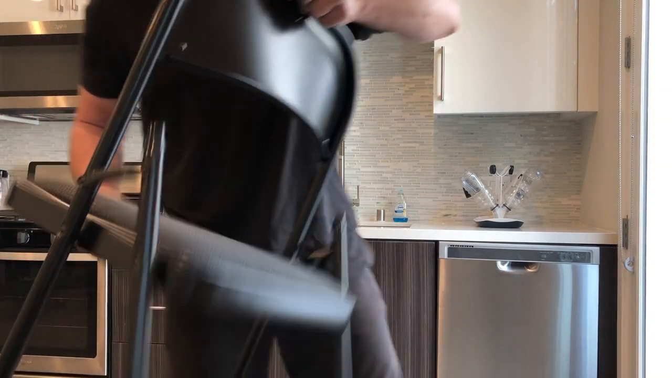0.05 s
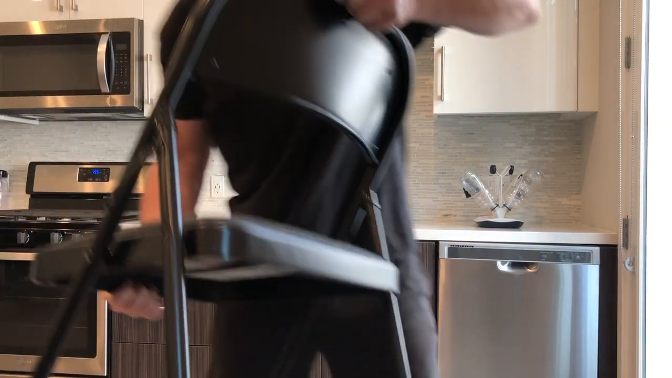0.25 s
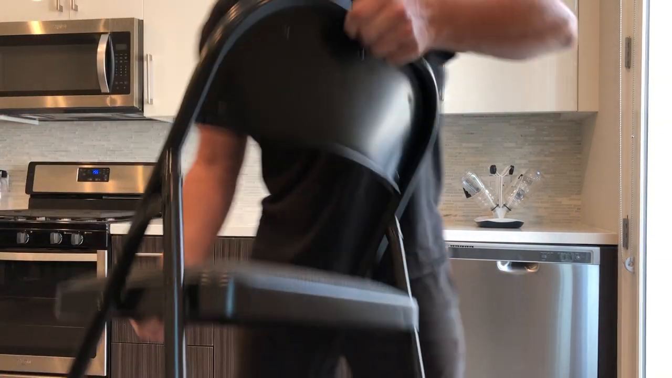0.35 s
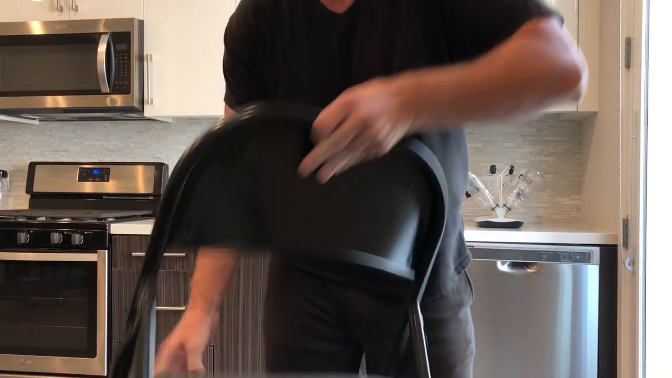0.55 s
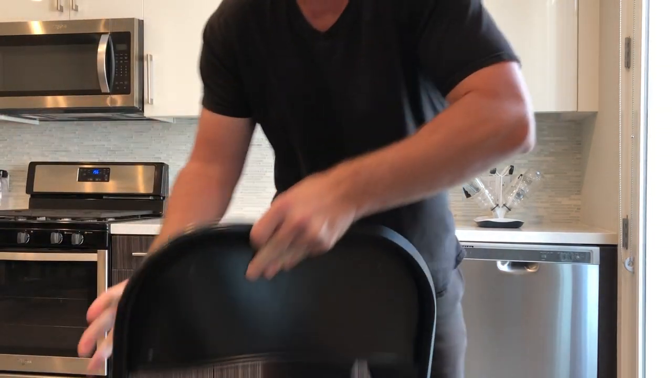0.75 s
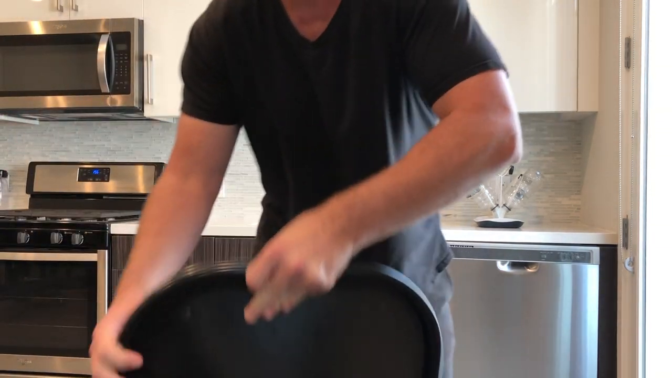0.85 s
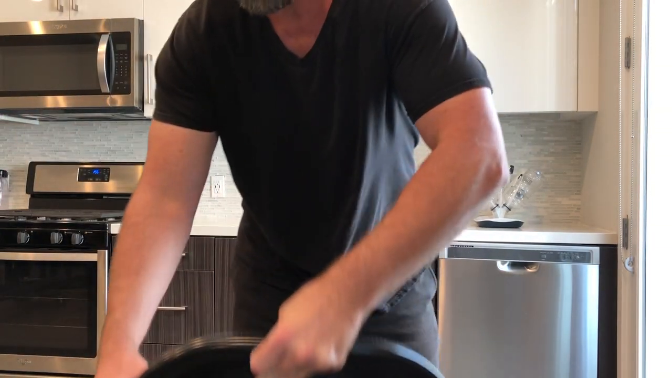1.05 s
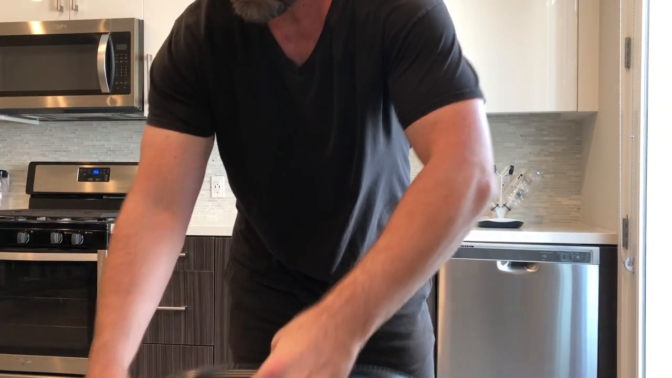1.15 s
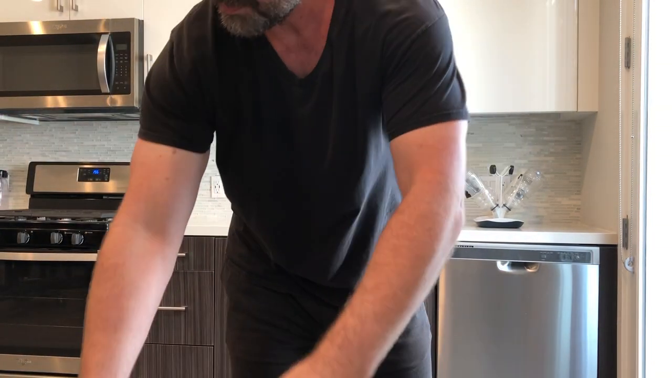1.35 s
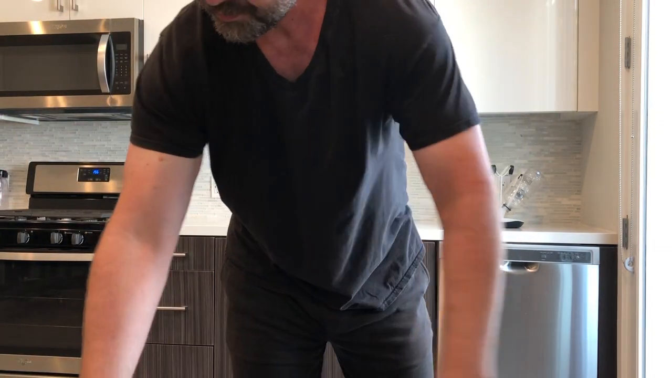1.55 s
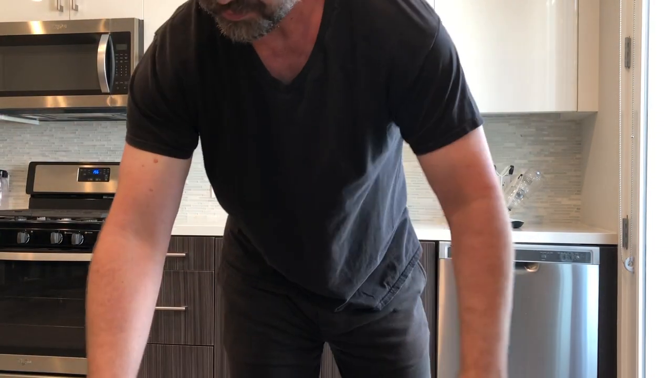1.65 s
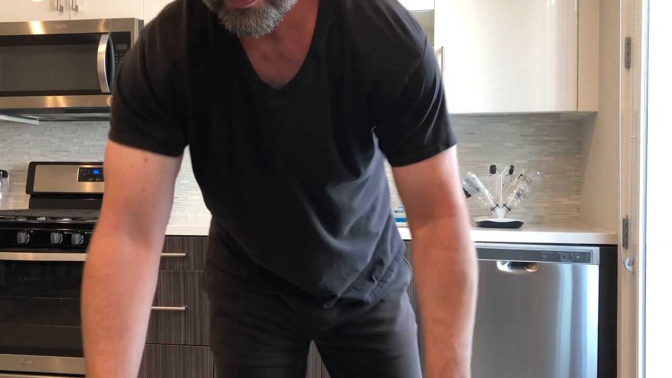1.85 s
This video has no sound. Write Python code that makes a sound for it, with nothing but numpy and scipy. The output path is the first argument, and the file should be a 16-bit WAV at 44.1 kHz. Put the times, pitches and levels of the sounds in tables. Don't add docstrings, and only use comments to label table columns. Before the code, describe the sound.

After two tiny hinge clicks, a folding chair's metal seat slams its stop and rings through a hard, reverberant kitchen; a soft brush follows, then its feet knock and scuffle down. Single microphone, faint room hum.

```python
import sys
import numpy as np
from scipy import signal
from scipy.fft import rfft, irfft
from scipy.io import wavfile
from scipy.ndimage import uniform_filter1d

SR = 44100
rng = np.random.default_rng(int(sys.argv[2]) if len(sys.argv) > 2 else 0)


def rack_gain(trim_db):
    fader = np.asarray(trim_db, float)
    return 10 ** (fader / 20)


def to_wav(sig):
    pcm = np.clip(np.atleast_2d(sig), -1, 1) * 32767
    pcm = np.round(pcm).astype(np.int16)
    wavfile.write(sys.argv[1], SR, pcm.T)


N = 83790

# (time [s], crack level [dB], ring level [dB], thud level [dB], crack length [s])
SEAT_HITS = [
    (.247, -13, -26, -56, 0.013),
    (.2495, -23, -59.5, -32, 0.0044),
    (.264, -34.5, -37.5, -25, 0.0043),
    (.278, -26.5, -42.5, -36, 0.017),
    (.293, -24, -27.5, -33, 0.0031),
]


def evened(x):
    return x / np.sqrt(np.mean(x ** 2) + 1e-20)


def read(points, hz):
    f, value = np.transpose(points)
    return np.interp(np.log(hz + 1), np.log(f + 1), value)


def colour(points, size=2048):
    log_gain = np.log(rack_gain(read(points, abs(np.fft.fftfreq(size, 1 / SR)))))
    response = np.exp(np.conj(signal.hilbert(log_gain)))
    taps = np.fft.ifft(response).real[:size // 2]
    return taps / np.linalg.norm(taps)


def hiss(points):
    gain = rack_gain(read(points, np.fft.rfftfreq(N, 1 / SR)))
    return evened(irfft(rfft(rng.standard_normal(N)) * gain, N))


def modes(table, longest_s, rise_s, count):
    t = np.arange(SR // 2) / SR
    spread = 0.06 * min(count / 3, 1)
    out = np.zeros(len(t))
    for hz, db, t60 in table:
        decay = rack_gain(db - 60 * t / np.clip(t60, 0.02, longest_s))
        pitch_hz = hz * (1 + spread * rng.uniform(-1, 1, (count, 1)))
        phase = (count > 1) * rng.random((count, 1))
        out += (decay * np.sin(2 * np.pi * (pitch_hz * t + phase))).sum(0)
    power = count * sum(rack_gain(2 * row[1]) for row in table) / 2
    return out * (1 - np.exp(-t / rise_s)) * np.cos(np.pi * t) / np.sqrt(power)


def room(x):
    # (frequency [Hz], t60 [s])
    band_t60 = [(60, 0.16), (120, 0.5), (300, 0.75), (1500, 0.93), (4000, 0.94), (7500, 0.75),
                (11000, 0.48), (16000, 0.43)]
    gap_s, build_s = 0.002, 0.0044
    taps = np.zeros(SR + SR // 2)
    at = np.arange(0, len(taps) - 10, 10)
    taps[at + rng.integers(0, 10, len(at))] = rng.choice([-1., 1.], len(at))
    hz, t, z = signal.stft(taps, SR, nperseg=256)
    tail = signal.istft(z * rack_gain(-60 * t / read(band_t60, hz)[:, None]), SR, nperseg=256)[1]
    late = np.maximum(np.arange(len(tail)) / SR - gap_s, 0)
    tail = tail * (1 - np.exp(-late / build_s))
    return signal.fftconvolve(x, tail / np.linalg.norm(tail))[:N]


def hits(rows, tone, ring, low, longest_s, wet_db, ring_wet_db, thud_wet_db):
    t = np.arange(2000) / SR
    crack, blow, strike, thud = np.zeros((4, N + SR))
    for s, crack_db, ring_db, thud_db, length in rows:
        at = round(s * SR)
        noise = rng.standard_normal(len(t))
        attack = np.minimum(t / 0.00013, 1)
        shape = attack * np.exp(-(t / np.clip(length, 0.001, 0.03)) ** 2)
        grain_db = 2.5 * 4.1 * uniform_filter1d(noise[::-1], size=9)
        crack[at:at + len(t)] += rack_gain(crack_db) * evened(noise * rack_gain(grain_db)) * shape
        blow[at] += rack_gain(crack_db) * np.linalg.norm(shape)
        strike[at] += rack_gain(ring_db)
        thud[at:at + SR // 2] += rack_gain(thud_db) * modes(low, 0.4, 0.001, count=1)
    crack, blow = signal.fftconvolve([crack, blow], [colour(tone)], axes=1)[:, :N]
    metal = signal.fftconvolve(strike, modes(ring, longest_s, 0.00036, count=14))[:N]
    thud = thud[:N]
    sent = rack_gain(wet_db) * blow + rack_gain(ring_wet_db) * metal + rack_gain(thud_wet_db) * thud
    return crack + metal + thud + room(sent)


def room_hum():
    # (frequency [Hz], level [dB])
    hum_tone = [(15, -52.5), (25, -17), (123, -12.5), (335, -10), (363, -18.5), (476, -18.5), (641, -23.5),
                (962, -19.5), (16000, -45)]
    return rack_gain(-59.5) * hiss(hum_tone)


def lurches():
    # (time [s], level [dB], width [s])
    shifts = [
        (.03, -50.5, 0.053),
        (.1, -53, 0.022),
        (1.0, -59, 0.085),
        (1.07, -74, 0.04),
        (1.43, -64, 0.045),
        (1.6, -47, 0.022),
        (1.69, -51, 0.026),
    ]
    t = np.arange(N) / SR
    low_pass = signal.butter(4, 100, fs=SR, output="sos")
    low = evened(signal.sosfilt(low_pass, rng.standard_normal(N)))
    return low * sum(rack_gain(db) * np.exp(-((t - s) / width) ** 2) for s, db, width in shifts)


def snaps():
    # (time [s], level [dB], length [s], centre [Hz], width [octaves])
    bursts = [(0.2462, -15.5, 0.0047, 4460, 2.2), (0.2476, -17.5, 0.005, 2010, 0.67),
              (0.27, -24, .006, 13700, 0.3), (0.125, -43.5, .008, 2000, 0.22), (0.128, -54, .005, 5000, .4),
              (0.125, -54, 0.016, 11800, 0.11), (0.2, -54, .012, 11500, .15),
              (0.2, -44, 0.0068, 2100, 0.39), (1.120, -58.5, 0.0032, 5460, 0.54),
              (1.2027, -40, 0.012, 8900, 2.1), (1.3426, -45, 0.0055, 12000, 0.48),
              (1.355, -44.5, 0.012, 7900, .6), (1.36, -50, .015, 13900, .25),
              (1.358, -54, 0.017, 5060, 0.12), (1.387, -39, 0.0052, 1470, 1),
              (1.440, -45.5, .005, 2360, 0.55), (1.441, -49.5, .008, 7940, 0.37),
              (1.465, -64, 0.15, 12500, 1), (1.555, -39, .003, 12000, 0.89),
              (1.565, -49, 0.025, 14000, 0.56), (1.571, -44.5, 0.013, 9100, 0.6),
              (1.556, -33, 0.002, 970, 1.6), (1.565, -42, 0.0057, 2960, 0.18),
              (1.583, -50, 0.0067, 11900, 0.55), (1.584, -55, 0.0099, 4150, 0.16),
              (1.657, -36.5, 0.0054, 2560, 0.37), (1.658, -46.5, 0.029, 7500, .4),
              (1.659, -52, 0.011, 14500, .2)]
    rise_s, wet_db = 0.001, -12.5
    t, noise = np.arange(N) / SR, rng.standard_normal(N)
    out = np.zeros(N)
    for s, db, length, hz, octaves in bursts:
        late = np.maximum(t - s, 0)
        edges_hz = np.clip(hz * 2 ** (np.array([-0.5, 0.5]) * octaves), 100, SR / 2 - 1000)
        band_pass = signal.butter(2, edges_hz, "band", fs=SR, output="sos")
        shape = (1 - np.exp(-late / rise_s)) * np.exp(-(late / length) ** 2)
        out += rack_gain(db) * shape * evened(signal.sosfilt(band_pass, noise))
    return out + rack_gain(wet_db) * room(out)


def hinge_ticks():
    # (time [s], crack level [dB], ring level [dB], thud level [dB], crack length [s])
    ticks = [
        (.126, -43, -51, -64, 0.0082),
        (.197, -41, -49, -59, 0.0064),
        (.230, -63, -43, -52, 0.004),
        (.241, -86, -62, -60, 0.0031),
        (.603, -49, -71, -35, 0.016),
        (.675, -58, -70, -45, 0.014),
        (1.120, -76, -92, -61, 0.0037),
    ]
    # (frequency [Hz], level [dB])
    tick_tone = [(180, -34), (300, -17), (555, -17.5), (1600, -12), (2050, -4), (2700, -17), (3400, -14.5),
                 (9880, -20.5), (11700, -21.5), (16000, -22.5)]
    # (frequency [Hz], level [dB], t60 [s])
    hinge = [(1990, 7, 0.045), (2900, 10, 0.094), (3590, 2, 0.035), (7300, -26.5, .06), (11500, -4, .09),
             (14500, -15, .04)]
    # (frequency [Hz], level [dB], t60 [s])
    grip_low = [(152.4, -4.5, 0.49), (305, 8, 0.088), (398.3, 8.5, 0.13)]
    return hits(ticks, tick_tone, hinge, grip_low, longest_s=0.1, wet_db=0.36, ring_wet_db=-16.5, thud_wet_db=-9)


def seat_clack():
    # (frequency [Hz], level [dB])
    clack_tone = [(35, -65.5), (60, -13), (156, -15.5), (389, -6), (666, -8.5), (1700, -10), (2520, -14),
                  (2770, -14.5), (16000, -22.5)]
    # (frequency [Hz], level [dB], t60 [s])
    seat = [(660, -3.5, 0.45), (803, -9.5, 0.21), (999, -4.5, 0.39), (1187, -10, 0.29), (1705, -2, 0.64),
            (1898, -1.5, 0.52), (2010, -11, 0.12), (2950, -6, 0.3), (4167, -12.5, 1), (5150, -21, 0.61),
            (6840, -3, 0.2), (14100, -24, .06)]
    # (frequency [Hz], level [dB], t60 [s])
    seat_low = [(72, -13, .15), (100.8, 1.5, 0.26), (142, -6.5, 0.53), (174, 0, 0.082), (290, -6.5, 0.22),
                (312, 0.5, .15), (393, 3.5, 0.39), (475, -3, .1)]
    return hits(SEAT_HITS, clack_tone, seat, seat_low,
                longest_s=0.62, wet_db=2.52, ring_wet_db=-6, thud_wet_db=-13.5)


def leg_tubes():
    # (frequency [Hz], level [dB], t60 [s])
    tubes = [(1620, -33, .7), (1700, -31, 0.8), (1770, -30, .75), (1850, -29, 0.8), (1930, -31, 0.7),
             (2075, -36, .65), (4110, -43, .95)]
    spread_hz, rise_s = 40, 0.0038
    t = np.maximum(np.arange(N) / SR - SEAT_HITS[0][0], 0)
    bins = np.fft.rfftfreq(N, 1 / SR)
    noise = rfft(rng.standard_normal(N))
    out = np.zeros(N)
    for hz, db, t60 in tubes:
        shimmer = irfft(noise * np.exp(-((bins - hz) / spread_hz) ** 2), N)
        out += rack_gain(db - 60 * t / t60) * evened(shimmer)
    return out * (1 - np.exp(-t / rise_s))


def booms():
    # (time [s], level [dB], frequency [Hz], half length [s])
    flexes = [(.253, -24, 388, 0.006), (.253, -41, 830, 0.011), (.2685, -13.5, 170.5, 0.0075),
              (.2685, -18, 300, 0.0054), (.2685, -15, 503, 0.0045), (.280, -15.5, 386.6, 0.0067),
              (.296, -17.5, 134, 0.0072), (.296, -25.5, 290, 0.008), (.324, -31.5, 145, 0.0088),
              (.327, -24, 327, 0.011), (.35, -32.5, 192, 0.016), (.38, -36, 203, 0.015),
              (.78, -60, 241, 0.035), (0.997, -55.5, 55, .035), (1.077, -59.5, 46, .05),
              (1.207, -32.5, 142, 0.011), (1.228, -34, 208, 0.0092), (1.275, -36.5, 200.4, 0.028),
              (1.363, -36.5, 152, 0.013), (1.395, -33.5, 532, 0.0086), (1.42, -36.5, 193, 0.017),
              (1.51, -39.5, 197, 0.047), (1.507, -43, 338, 0.0037), (1.563, -37.5, 547, 0.011),
              (1.5705, -27, 710, 0.00078), (1.573, -32, 363, 0.0053), (1.59, -36.5, 202, 0.0084),
              (1.658, -33, 604, 0.0013), (1.665, -36.5, 212, 0.026), (1.665, -37, 344, 0.016),
              (1.745, -43.5, 200, .015)]
    t = np.arange(N) / SR
    direct = np.zeros(N)
    for s, db, hz, half in flexes:
        direct += rack_gain(db) * np.exp(-((t - s) / half) ** 2) * np.cos(2 * np.pi * hz * (t - s))
    return direct + rack_gain(-8.5) * room(direct)


def rustle():
    # (frequency [Hz], level [dB])
    cloth_tone = [(120, -50), (200, -24), (763, -2.5), (968, -4), (1060, -8), (1680, -6), (16000, -24.5)]
    peak_s, rise_s, fall_s = 0.94, 0.04, 0.1
    t = np.arange(N) / SR
    swell = np.exp(-((t - peak_s) / np.where(t < peak_s, rise_s, fall_s)) ** 2)
    flicker = rack_gain(evened(uniform_filter1d(rng.standard_normal(N), 500)))
    return rack_gain(-57) * swell * flicker * hiss(cloth_tone)


def feet_knocks():
    # (time [s], crack level [dB], ring level [dB], thud level [dB], crack length [s])
    knocks = [(1.190, -42, -40.5, -41.5, 0.013), (1.197, -33.5, -36, -38.5, 0.013),
              (1.230, -77, -55, -45, 0.0045), (1.343, -42, -44, -58, 0.02),
              (1.351, -39.5, -37.5, -41.5, 0.004), (1.356, -36, -56, -58, 0.009),
              (1.388, -56, -69, -39, 0.011), (1.424, -63, -69, -50, 0.0066),
              (1.440, -38, -46.5, -68, 0.0048), (1.485, -58, -68, -35.5, .015),
              (1.557, -37, -45, -35, 0.017), (1.569, -33.5, -44, -61, 0.0084), (1.584, -63, -54, -53, .004),
              (1.640, -54, -71, -37.5, 0.0072), (1.657, -38, -42, -69, 0.015),
              (1.700, -74, -70, -55, 0.0081), (1.735, -68, -54, -76, 0.0058)]
    # (frequency [Hz], level [dB])
    knock_tone = [(35, -70.5), (60, -2.5), (217, -8), (822, -9), (3000, -18), (4200, -26.5), (9570, -25),
                  (14900, -33), (16000, -44)]
    # (frequency [Hz], level [dB], t60 [s])
    legs = [(1954, -1, 0.16), (2936, -1.5, 0.057), (5070, -10.5, 0.11), (6180, -5, 0.03), (6930, -9, 0.081),
            (8740, -12.5, .05), (9400, -6.5, 0.14), (12300, -25, 0.02), (14200, -7.5, 0.14)]
    # (frequency [Hz], level [dB], t60 [s])
    front_low = [(74, -20, 0.24), (142, -3.5, 0.25), (193, -5.5, 0.14), (224, -2.5, 0.16),
                 (299, -2.5, 0.12), (352, -4.5, .12)]
    back_low = [(79.2, -10.5, 0.45), (149, 1, 0.075), (185.5, -1, 0.11), (217, -5, 0.25), (300.5, -7, 0.41),
                (340, 0.5, 0.17), (526.5, -3.5, 0.088)]
    front = hits(knocks[:5], knock_tone, legs, front_low,
                 longest_s=0.15, wet_db=2.6, ring_wet_db=-6, thud_wet_db=2.1)
    back = hits(knocks[5:], knock_tone, legs, back_low,
                longest_s=0.2, wet_db=2.45, ring_wet_db=-9.5, thud_wet_db=-4)
    return front + back


def scene():
    mix = room_hum() + lurches() + snaps() + hinge_ticks() + seat_clack()
    mix = mix + leg_tubes() + booms() + rustle() + feet_knocks()
    return np.array([mix, mix])


def roll_off(x):
    return signal.sosfilt(signal.butter(12, 16960, fs=SR, output="sos"), x)


def record(dry):
    limit, edge_hz = 0.9, 15780
    cut = signal.sosfilt(signal.butter(3, 42, "high", fs=SR, output="sos"), dry)
    limited = limit * np.tanh(cut / limit)
    low_pass = signal.firwin(401, edge_hz, window=("kaiser", 3), fs=SR)
    return roll_off(signal.oaconvolve(limited, low_pass[None], "same"))


dry = scene()
out = record(dry)
to_wav(out)
```